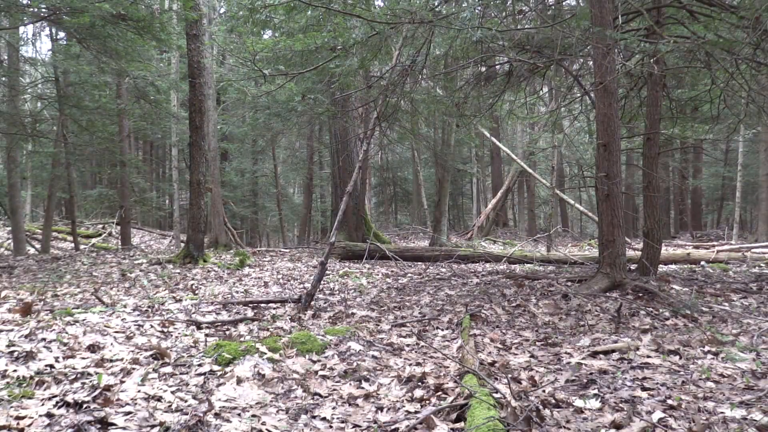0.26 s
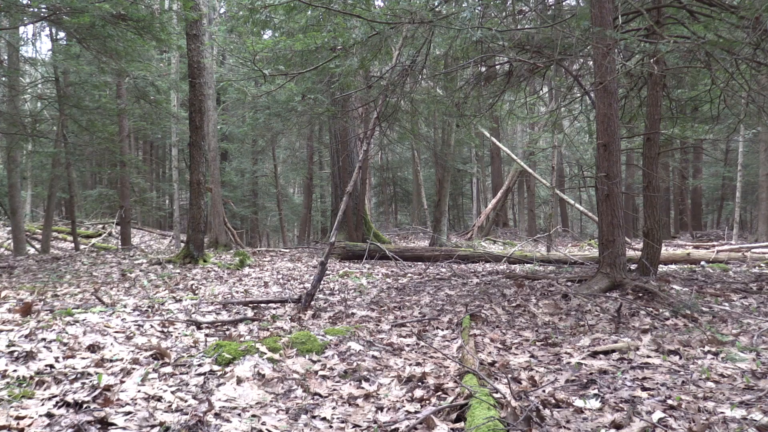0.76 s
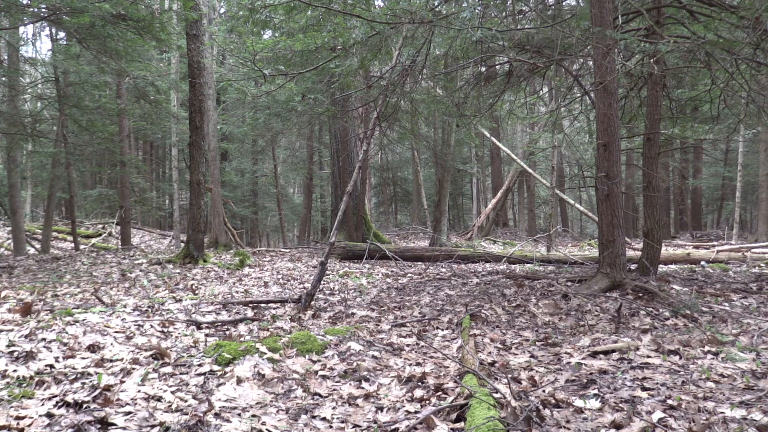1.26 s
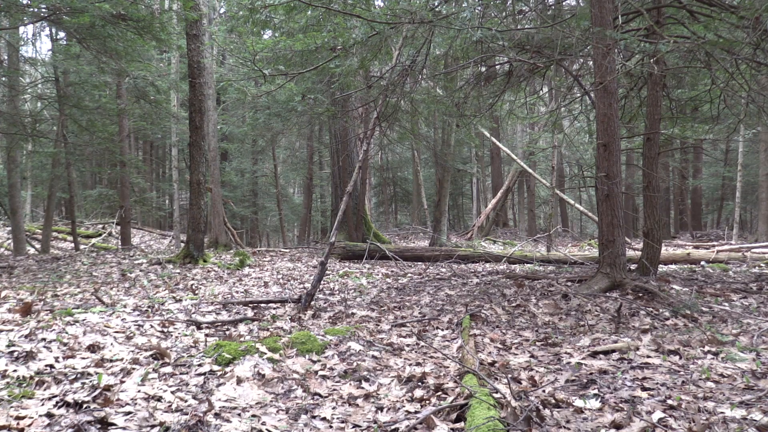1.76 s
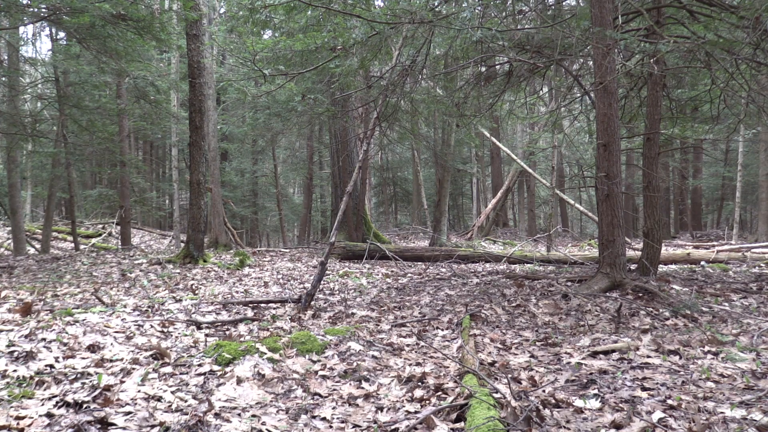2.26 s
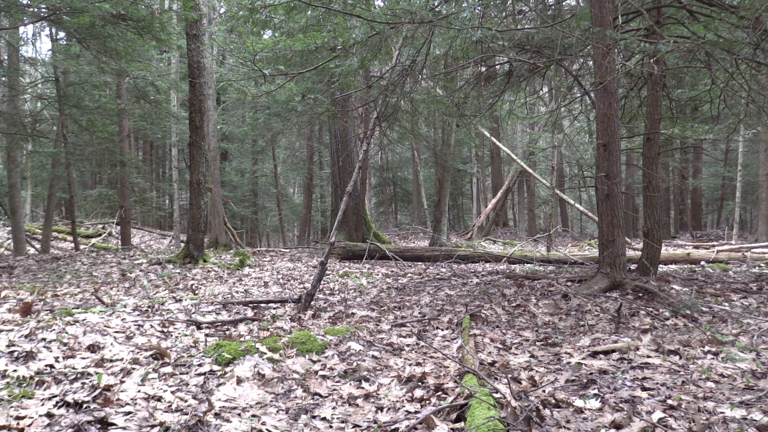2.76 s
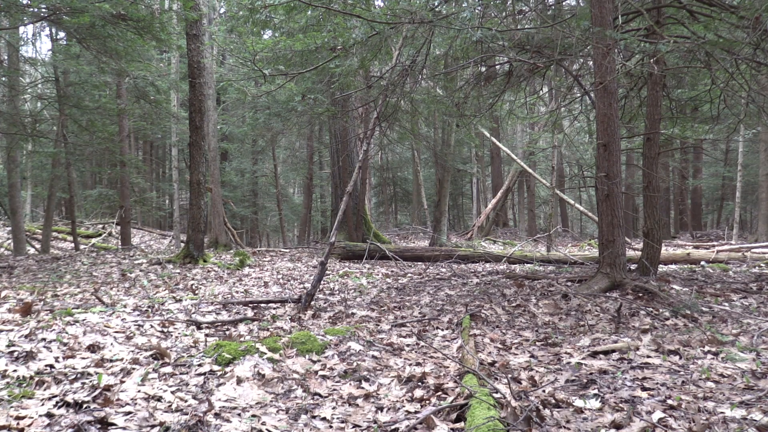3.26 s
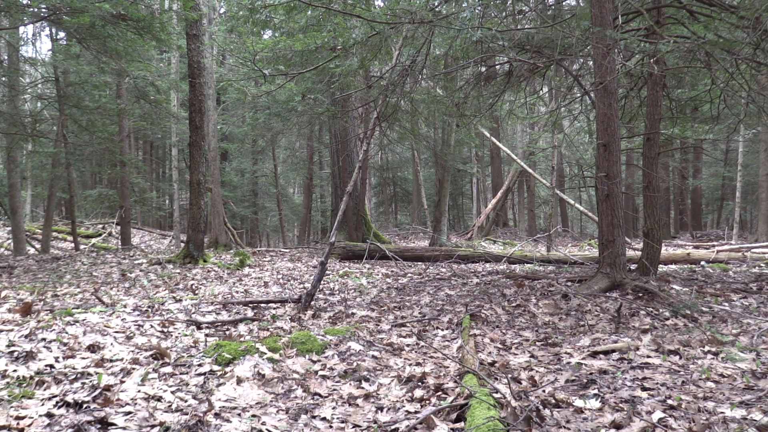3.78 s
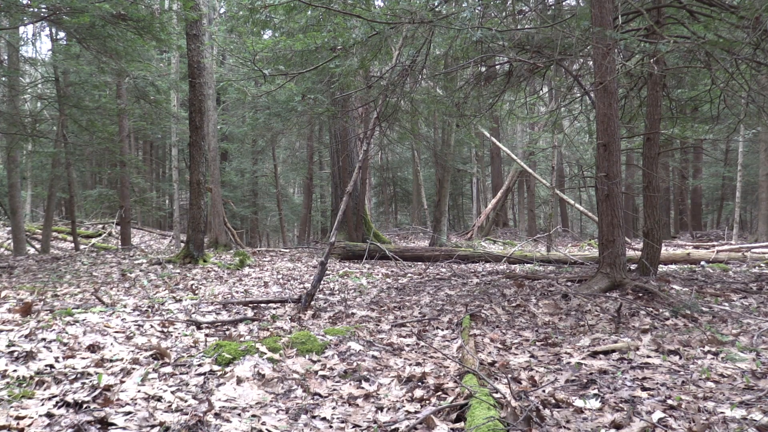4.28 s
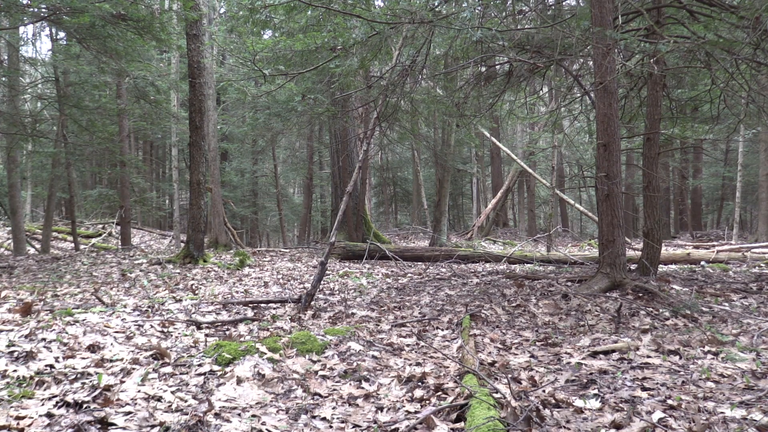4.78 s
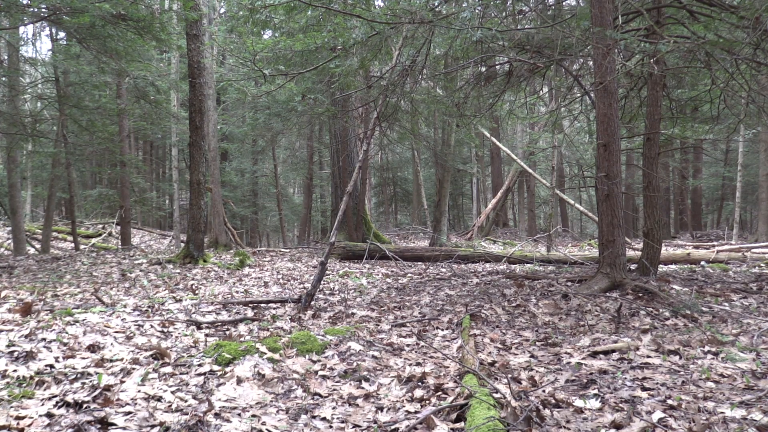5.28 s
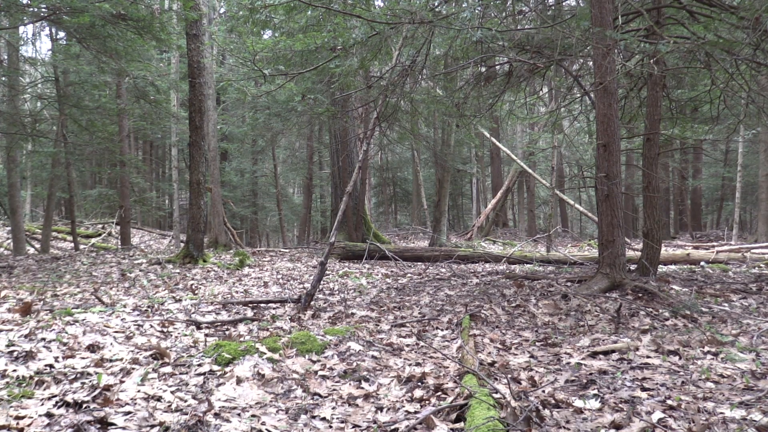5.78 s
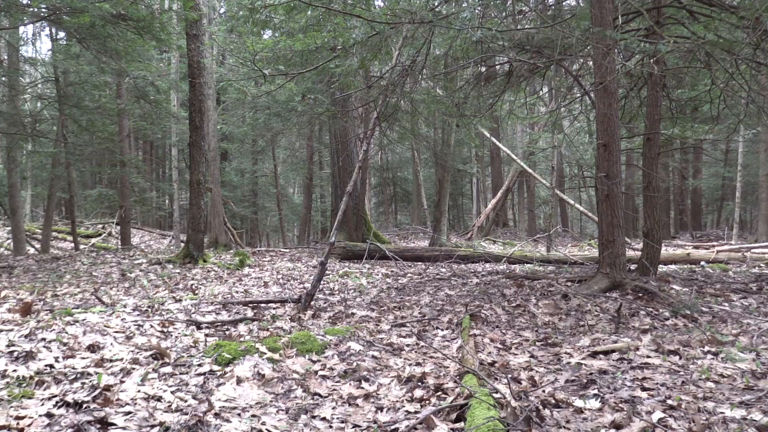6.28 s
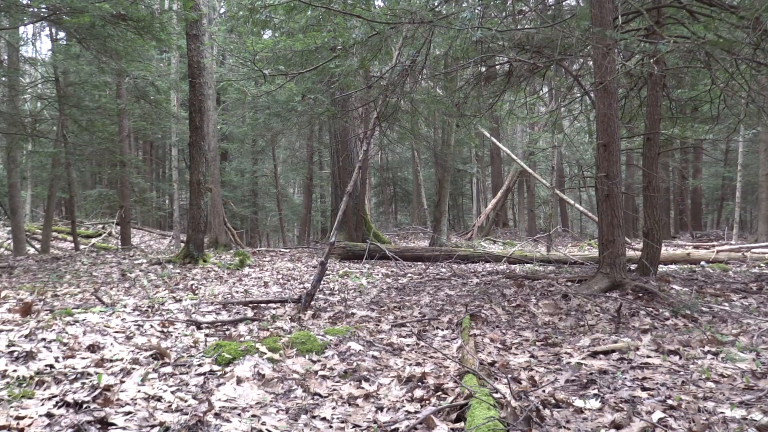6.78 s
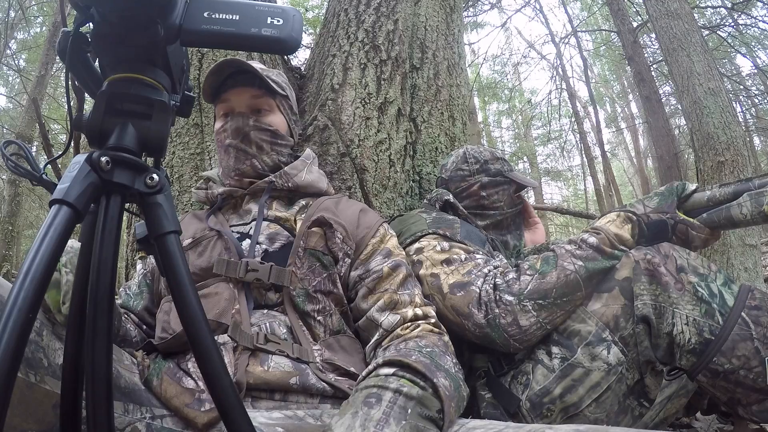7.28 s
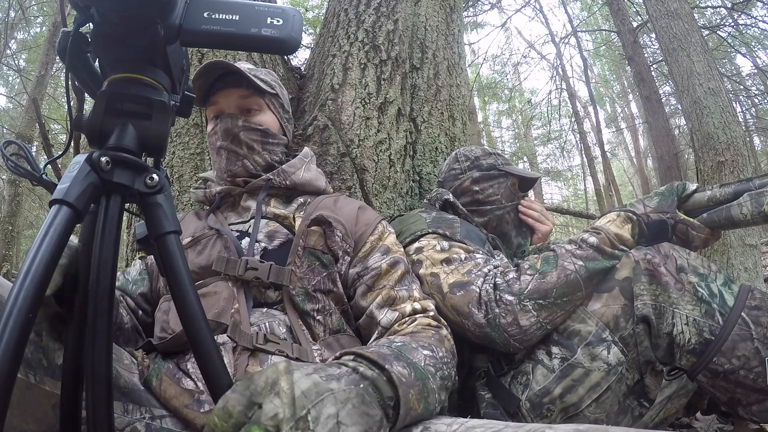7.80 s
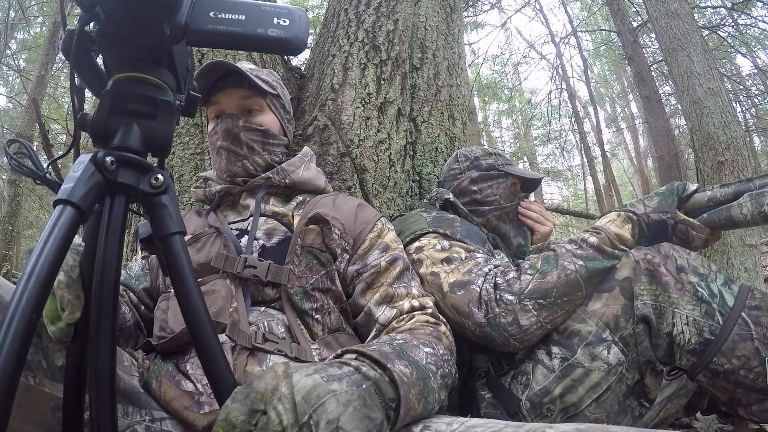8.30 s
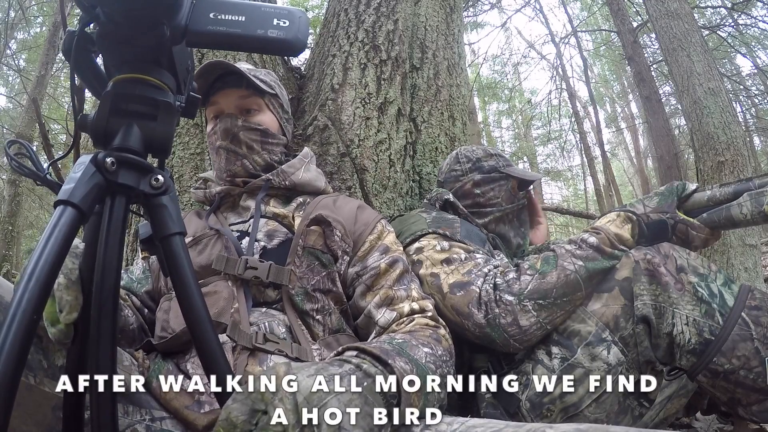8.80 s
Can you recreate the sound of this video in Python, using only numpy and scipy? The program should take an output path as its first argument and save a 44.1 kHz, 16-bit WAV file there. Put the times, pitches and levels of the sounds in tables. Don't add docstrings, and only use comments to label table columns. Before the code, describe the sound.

Quiet forest with a smooth, faint wind hiss. Isolated, very short, woody turkey clucks sound dry and close, with quick reflections and a faint diffuse tail. A far gobbler replies after the opening cluck with thin squeals and a rough, tumbling rattle, blurred by reverberation. Later come five spaced clucks, faint cloth rustling, tiny dry snaps and deep gusty thumps on the single microphone, then a last cluck and another distant gobble.

```python
import sys
import numpy as np
from scipy import signal
from scipy.fft import rfft, irfft
from scipy.io import wavfile
from scipy.ndimage import uniform_filter1d

SR = 44100
rng = np.random.default_rng(int(sys.argv[2]) if len(sys.argv) > 2 else 0)


def persist_wave(psi):
    counts = np.round(np.clip(psi, -1, 1) * 32767).astype(np.int16)
    wavfile.write(sys.argv[1], SR, np.atleast_2d(counts).T)


def makeup_ratio(level_db):
    decades = np.asarray(level_db, float) / 20
    return 10 ** decades


N = 399105

# start in s, peak in dB, length in s, first pitch in Hz, last pitch in Hz.
CLUCKS = [
    (0.0252, 0, 0.0059, 658, 613),
    (2.361, -24.5, 0.014, 623, 593),
    (2.8248, 1.5, 0.0097, 602.4, 646),
    (4.2505, -2, 0.0095, 702, 546),
    (4.9894, 0, 0.0044, 616, 655),
    (5.9766, 1, 0.0053, 613, 652),
    (7.1024, 0.5, 0.0101, 655, 591),
    (8.5291, -3.5, 0.01, 646, 655),
]
# start in s, throat in dB, strong-weak beat in dB, edge in dB, air in dB.
BLOWING = [(.03, 4.5, -6, 3.5, -3), (2.37, 11, 7.5, -10, 4), (2.83, 1.5, -6.5, 7.5, 4),
           (4.26, 6.5, -9.5, -1, 4.5), (4.99, 7.5, -6, 7, 3.5), (5.98, 2, -7, -2, -5),
           (7.11, 10.5, -15, -1, 0.5), (8.53, 9.5, -35, -4, 2.5)]
# start in s, peak in dB, length in s, pitch in Hz, mouth resonance in Hz.
SLACK_BUZZES = [
    (0.032, -8, 0.012, 757, 1770),
    (2.3712, -17.5, 0.0051, 660, 1380),
    (2.835, -15.5, 0.015, 565, 1440),
    (4.258, -11.5, 0.0064, 595, 1550),
    (4.9941, -4.5, 0.01, 884, 1914),
    (5.983, -10, 0.0075, 573, 1730),
    (5.987, -16, 0.017, 592, 1370),
    (7.109, -20, 0.0086, 603, 1700),
    (8.5267, -12, 0.012, 741, 1360),
    (8.535, -54, 0.011, 660, 1810),
]
# centre in Hz, width in Hz, level in dB.
THROAT = [(327, 35, -28), (660, 780, -41.5), (1065, 390, -22.5)]
# centre in Hz, width in Hz, level in dB.
EDGE = [(3040, 430, -27.5), (4840, 670, -38)]
# centre in Hz, width in Hz, level in dB.
AIR = [(4590, 2700, -33.5), (7800, 7200, -40.5), (9730, 560, -39), (11900, 1500, -68)]
# frequency in Hz, gain in dB.
FORWARD = [(400, -7.5), (800, -2), (1300, 3), (1900, -1.5), (2400, 6.5), (3000, 8.5), (4000, 7.5),
           (6000, 1), (10000, 12.5), (14000, 12)]
# delay in s, level in dB.
TRUNKS = [(0.0106, -17), (0.017, -28.5), (.021, -37), (.032, -17.5), (.044, -33.5), (.056, -22),
          (.079, -27), (.1, -38), (.112, -33.5), (.126, -36), (.163, -30.5), (.176, -29), (.19, -34),
          (.212, -36), (.235, -46), (.27, -48), (.341, -37), (.356, -31.5)]
# frequency in Hz, time to fall 60 dB in s.
NEAR_RING = [(300, 0.24), (700, 0.99), (1500, 1), (3000, 0.99), (6000, 0.36), (12000, 0.23)]
# delay in s, half width in s.
CLEARING = (0.151, 0.0085)

# start in s, peak of middle
# tone in dB, low tone above it in dB, high tone above it in dB.
GOBBLE_NOTES = [(.432, -40, -22, 8.5), (.458, -38, -9, 5.5), (.515, -30.5, -15, -7),
                (0.534, -29.5, -14, -9), (0.566, -36.5, -3, -4), (0.619, -41, -1, -15),
                (0.672, -33.5, -3.5, -5), (0.724, -32, -1.5, -4), (0.752, -34, -3.5, -3),
                (0.792, -39, 3.5, -12), (0.817, -34.5, -19, -15), (0.857, -27, -14, -22),
                (0.912, -40, 2, 5), (0.94, -39, 1, -3), (0.997, -33, -4.5, -20), (1.037, -30, -6, -17),
                (1.078, -38.5, 2.5, -3), (1.119, -40, 7.5, -3), (1.165, -37, -6, -17), (1.2, -34, -20, -20),
                (1.282, -38, -3, -10), (1.305, -44, 7.5, -13), (1.463, -38, -5, -22),
                (1.529, -41.5, -1, -11), (1.665, -43.5, 6.5, -16), (8.96, -28, -16, -7.5),
                (8.98, -38.5, 1, -3), (9.0, -46, -5, 1), (9.024, -46, 2, -3)]
GOBBLE_STARTS = [.43, 8.857]
# start in s, peak in dB, length in s, pitch in Hz, its level under the octave in dB.
SQUEALS = [
    (0.446, -24.5, 0.027, 848, -19),
    (0.492, -27.5, .05, 935, -9.5),
    (8.858, -22, 0.051, 932, -10.5),
    (8.931, -32, 0.047, 956, -27),
    (8.944, -27.5, 0.028, 818, -11),
    (8.969, -30, .05, 500, -26),
]
# time after gobble start in s, middle throat tone in Hz, low tone in Hz.
NECK = [(0, 1175, 620), (.055, 1180, 620), (.085, 1360, 700), (.2, 1280, 705.5), (.24, 1144, 687.4),
        (.43, 1100, 694.2), (.75, 1083, 642.4), (1.05, 990, 619.5), (1.7, 1030, 641.5)]
NOTE_SCATTER = np.array([.03, .075])
# frequency in Hz, time to fall 60 dB in s.
FAR_RING = [(400, 0.57), (1000, 1.47), (2000, 0.69), (5000, 0.12)]

# start in s, peak in dB, centre in Hz.
TICKS = [
    (2.3637, -39, 8200),
    (2.38, -50, 8000),
    (8.729, -44, 9500),
    (7.815, -54, 7000),
]
# time in s, level in dB.
RUSTLE = [
    (7.659, -80),
    (7.72, -62),
    (7.79, -64),
    (7.88, -75),
    (7.95, -90),
]
# time in s, buffet in dB.
GUSTS = [
    [(5.0, -70), (5.11, -42), (5.38, -27.5), (5.41, -50), (5.456, -32), (6.138, -27), (6.188, -22),
     (6.764, -52.5), (6.8, -56)],
    [(7.7, -52), (7.745, -26), (7.82, -12), (7.97, -10), (8.04, -23), (8.22, -5), (8.66, -17),
     (8.75, -21.5), (9.05, -16.5)],
]
# frequency in Hz, level in dB per Hz.
BUFFET = [(5, -3), (8, 10), (20, 9), (32, -11), (60, -28), (100, -39), (200, -42), (400, -89)]
# centre in s, peak in dB, width in s.
THUMPS = [(8.1815, -13, .0019), (8.19, -22, .002), (8.152, -30, .002), (8.204, -27, .002),
          (8.485, -27, .0018), (7.735, -30, .003), (7.79, -25, .003), (7.845, -24, .0035), (7.9, -29, .004)]
# frequency in Hz, level in dB per Hz.
CROWN_HISS = [(24, -37), (40, -5.5), (65, 2), (100, -1), (170, -6), (300, -16), (420, -16), (620, -8.5),
              (1100, -10.5), (2200, -11.5), (3500, -15), (4600, -25.5), (7300, -34.5), (15600, -40)]


def evened(x):
    return x / np.sqrt(np.mean(x ** 2) + 1e-20)


def read(points, hz):
    f, value = np.transpose(points)
    return np.interp(np.log(hz + 1), np.log(f + 1), value)


def add(mix, s, sound):
    part = mix[round(s * SR):][:len(sound)]
    part += sound[:len(part)]


def resonate(x, hz, width):
    turn = np.exp(2j * np.pi * np.cumsum(hz + np.zeros(len(x))) / SR)
    r = np.exp(-np.pi * width / SR)
    return 2 * (turn * signal.lfilter([1 - r], [1, -r], x / turn)).real


def response(hz, modes):
    return sum(makeup_ratio(db) / (1 + (2 * (hz - f) / width) ** 2) for f, width, db in modes)


def filtered(x, points, size):
    return irfft(rfft(x, size) * makeup_ratio(read(points, np.fft.rfftfreq(size, 1 / SR))))[:N]


def coloured(spectrum):
    return evened(filtered(rng.standard_normal(N + 1), spectrum, N + 1))


def forest(ring, start_s, spread_db):
    taps = np.zeros(SR * 3 // 2)
    at = np.arange(0, len(taps) - 30, 30)
    place, sign, size = rng.random((len(at), 3)).T
    taps[at + (30 * place).astype(int)] = np.sign(sign - 0.5) * makeup_ratio(-spread_db * np.log(size))
    hz, t, z = signal.stft(taps, SR, nperseg=256)
    tail = signal.istft(z * makeup_ratio(-60 * t / read(ring, hz)[:, None]), SR, nperseg=256)[1]
    tail = tail * np.clip(np.arange(len(tail)) / SR / start_s, 0, 1)
    return tail / np.linalg.norm(tail)


def cluck(s, db, length, first_hz, last_hz, mouth_hz):
    throat_db, beat_db, edge_db, air_db = min(BLOWING, key=lambda row: abs(row[0] - s))[1:]
    t = np.arange(0, length + 0.018, 1 / SR)
    wobble, flutter, air = rng.standard_normal((SR // 20, 3))[:len(t)].T
    hz = np.interp(t, [0, length], [first_hz, last_hz])
    hz = hz * (1 + 0.018 * evened(uniform_filter1d(wobble, size=90)))

    order = np.arange(1, 24)[:, None] / 2
    lines_hz = order * hz
    gain = response(lines_hz, [(mouth_hz, 620, 0)]) ** 2
    gain = gain + makeup_ratio(throat_db) * response(lines_hz, THROAT)
    gain = gain + makeup_ratio(edge_db) * response(lines_hz, EDGE[:1])
    gain = gain + makeup_ratio(-0.45 * beat_db) * response(lines_hz, EDGE[1:])
    gain = gain * np.where(order % 1 > 0, makeup_ratio(beat_db), 1)
    turns = np.cumsum(hz) / SR
    buzz = evened((gain * np.cos(2 * np.pi * (order * turns + rng.random(order.shape)))).sum(0))

    slack = np.clip(-db / 12, 0, 1)
    buzz = buzz * (1 + (0.06 + 0.037 * slack) * evened(uniform_filter1d(flutter, size=50)))
    buzz = buzz * makeup_ratio(-7 * slack * t / length)
    buzz = buzz + makeup_ratio(-16) * evened(resonate(resonate(air, mouth_hz, 500), mouth_hz, 500))
    hiss = sum(makeup_ratio(air_db + d) * evened(resonate(resonate(air, f, w), f, w)) for f, w, d in AIR)
    puffs = 0.76 + 0.69 * np.exp(-(turns % 1) / 0.81)
    hiss = hiss * puffs * makeup_ratio(-5 * slack)

    breath = np.clip(t / 0.00087, 0, 1) * np.exp(-np.maximum(t - length + 0.00097, 0) / 0.0013)
    band = signal.butter(2, [420, 12500], "bandpass", fs=SR, output="sos")
    sound = signal.sosfilt(band, breath * (buzz + hiss))
    return makeup_ratio(db) * sound / abs(sound).max()


def hum(s):
    length = 0.0173
    t = np.arange(0, length, 1 / SR)
    throat_db = min(BLOWING, key=lambda row: abs(row[0] - s))[1]
    return makeup_ratio(-30 + throat_db) * np.sin(np.pi * t / length) * np.sin(2 * np.pi * 655 * t)


def reed_call():
    mouth_overtone = 2.913
    slack_sag = 0.047
    rows = [(*row, mouth_overtone * np.mean(row[-2:])) for row in CLUCKS]
    for s, db, length, hz, mouth_hz in SLACK_BUZZES:
        rows.append((s, db, length, hz, hz * (1 - slack_sag), mouth_hz))
    dry = np.zeros(N)
    for row in sorted(rows):
        add(dry, row[0], cluck(*row))
    near = dry.copy()
    for s, db, *_ in CLUCKS:
        if db > -15:
            add(near, s - 0.003, cluck(s, -16, 0.0025, 640, 640, 1900))
            add(near, s - 0.003, hum(s))
            add(dry, s - 0.003, hum(s))

    aimed = filtered(dry, FORWARD, 2 * N)
    for delay, db in TRUNKS:
        keep = np.exp(-2 * np.pi * 900 / np.sqrt(delay) / SR)
        add(near, delay, makeup_ratio(db) * signal.lfilter([1 - keep], [1, -keep], aimed))
    tail = forest(NEAR_RING, 0.026, spread_db=2.0)
    gap_s, half_width_s = CLEARING
    tail = tail * (1 - np.exp(-((np.arange(len(tail)) / SR - gap_s) / half_width_s) ** 4))
    return near + makeup_ratio(-21) * signal.fftconvolve(aimed, tail)[:N]


def pulses(hz, jitter, uneven, rough):
    wobble, air = rng.standard_normal((len(hz), 2)).T
    turns = np.cumsum(hz * (1 + jitter * evened(uniform_filter1d(wobble, size=60)))) / SR
    train = sum(np.cos(2 * np.pi * k * turns) for k in range(1, 18))
    train = train * (1 + uneven * np.cos(np.pi * turns))
    puffs = air * np.exp(-(turns % 1) / 0.24)
    return (1 - rough) * evened(train) + rough * evened(puffs)


def note(db, mid_hz, low_hz, low_db, high_db):
    t = np.arange(-0.02, 0.08, 1 / SR)
    shift, rattle_turn, rattle_rate = rng.random(3)
    effort = np.sin(np.pi / 2 * np.clip(t / 0.0023, 0, 1)) * np.exp(-(t / 0.03) ** 2)
    rattle_hz = 60 + 35 * rattle_rate
    effort = effort * (1 + 0.35 * np.cos(2 * np.pi * (rattle_hz * t + rattle_turn)))
    drive = pulses(low_hz / 2 * (1 - 0.8 * t), jitter=0.04, uneven=0.3, rough=0.42)
    droop = 1.015 - 1.2 * t
    beak_db = (low_db + high_db) / 2
    tones = [(mid_hz, 95, 0), (low_hz, 95, low_db), (1790 + 130 * shift, 130, high_db), (1300, 1000, -12),
             (3320, 150, beak_db - 10), (3800, 300, beak_db - 15), (5450, 90, beak_db - 24)]
    voice = sum(makeup_ratio(d) * evened(resonate(resonate(drive, f * droop, w), f * droop, 2 * w))
                for f, w, d in tones)
    return (makeup_ratio(db) * effort * voice)[t >= 0]


def squeal(db, length, hz, under_db):
    t = np.arange(0, length, 1 / SR)
    wobble, shake = rng.standard_normal((SR // 10, 2))[:len(t)].T
    rising_hz = hz * (1 + 0.035 * t / length)
    phase = 2 * np.pi * np.cumsum(rising_hz * (1 + 0.037 * evened(uniform_filter1d(wobble, size=150)))) / SR
    tone = makeup_ratio(under_db) * np.sin(phase) + np.sin(2 * phase) + makeup_ratio(-22) * np.sin(3 * phase)
    swell = np.sin(np.pi * (t / length) ** 0.67) ** 2
    return makeup_ratio(db) * swell * (1 + 0.22 * evened(uniform_filter1d(shake, size=120))) * tone


def turkey():
    dry = np.zeros(N)
    for s, *row in SQUEALS:
        add(dry, s, squeal(*row))
    dying_from_s, dying_to_s, dying_gap_s = 1.23, 2.12, 0.066
    dying = [(s, -42.5 - 8.5 * (s - dying_from_s), 0.5, -19)
             for s in np.arange(dying_from_s, dying_to_s, dying_gap_s)]
    since, neck_mid_hz, neck_low_hz = np.transpose(NECK)
    for s, db, low_db, high_db in GOBBLE_NOTES + dying:
        age = s - max(start for start in GOBBLE_STARTS if start < s)
        mid_stray, low_stray = 1 + NOTE_SCATTER * rng.uniform(-1.028, 1, size=2)
        mid_hz = np.interp(age, since, neck_mid_hz) * mid_stray
        low_hz = np.interp(age, since, neck_low_hz) * low_stray
        add(dry, s, note(db, mid_hz, low_hz, low_db, high_db))
    wet = makeup_ratio(-10) * signal.fftconvolve(dry, forest(FAR_RING, 0.03, spread_db=3))[:N]
    return makeup_ratio(-4.0) * (dry + wet)


def stirrings():
    cloth = coloured([(2000, -32), (5000, 6), (11000, -9), (15000, -14)])
    out = makeup_ratio(np.interp(np.arange(N) / SR, *np.transpose(RUSTLE))) * cloth
    t = np.arange(200) / SR
    for s, db, hz in TICKS:
        snap = evened(resonate(rng.standard_normal(len(t)), hz, 3500))
        add(out, s, makeup_ratio(db) * snap * np.exp(-t / 0.0014))
    return out


def wind():
    t = np.arange(N) / SR
    lumps = coloured(BUFFET)
    lumps = lumps / np.sqrt(uniform_filter1d(lumps ** 2, size=6000))
    swell = coloured([(0.5, 0), (3, 0), (6, -60)])
    gusts = sum(makeup_ratio(np.interp(t, *np.transpose(rows), left=-90, right=-90)) for rows in GUSTS)
    breeze = makeup_ratio(-55.5 + 2.5 * swell)
    strength = gusts * makeup_ratio(-4.0) + breeze
    strength = signal.sosfiltfilt(signal.butter(2, 60, fs=SR, output="sos"), strength)
    eddies = sum(makeup_ratio(db) / (1 + ((t - s) / w) ** 2) for s, db, w in THUMPS)
    return strength * lumps * makeup_ratio(3.5) + eddies


def crowns():
    _, t, z = signal.stft(coloured(CROWN_HISS), SR, nperseg=1024)
    patches = uniform_filter1d(rng.standard_normal(z.shape), size=12, axis=0)
    patches = evened(uniform_filter1d(patches, size=8, axis=1))
    swell = evened(uniform_filter1d(rng.standard_normal(len(t)), size=60))
    field_db = 0.9 * patches + 0.35 * swell
    return makeup_ratio(-45.5) * evened(signal.istft(z * makeup_ratio(field_db), SR, nperseg=1024)[1][:N])


def scene():
    return (reed_call() + turkey() + stirrings() + wind() + crowns())[None]


def roll_off(x):
    return signal.sosfilt(signal.butter(12, 15710, fs=SR, output="sos"), x)


def record(dry):
    soft = dry / (1 + abs(dry / 0.97) ** 8) ** (1 / 8)
    return roll_off(soft)


dry = scene()
out = record(dry)
persist_wave(out)
```